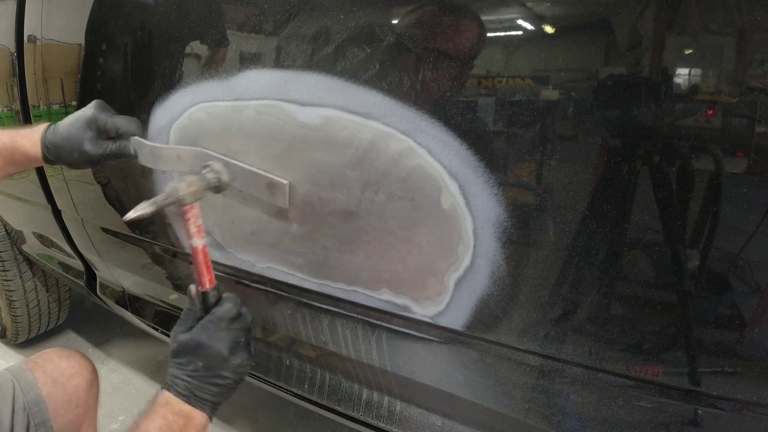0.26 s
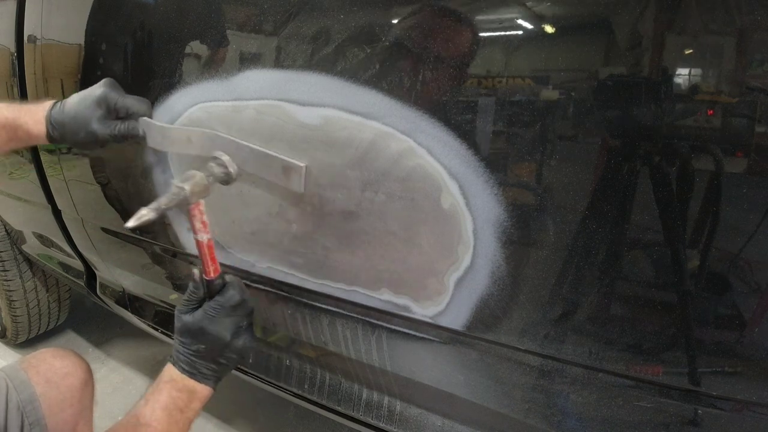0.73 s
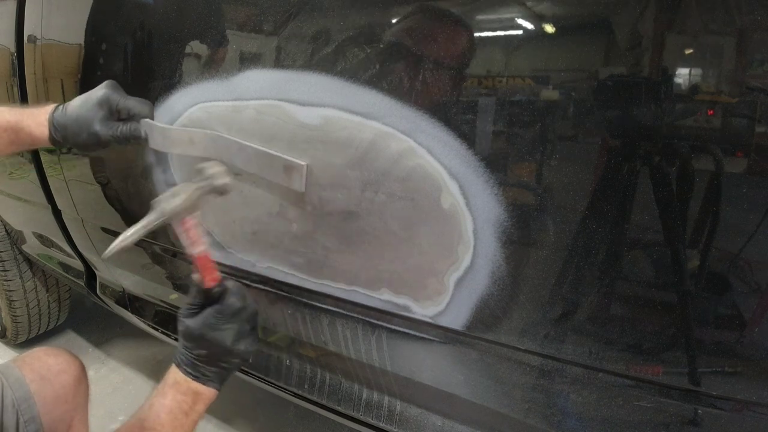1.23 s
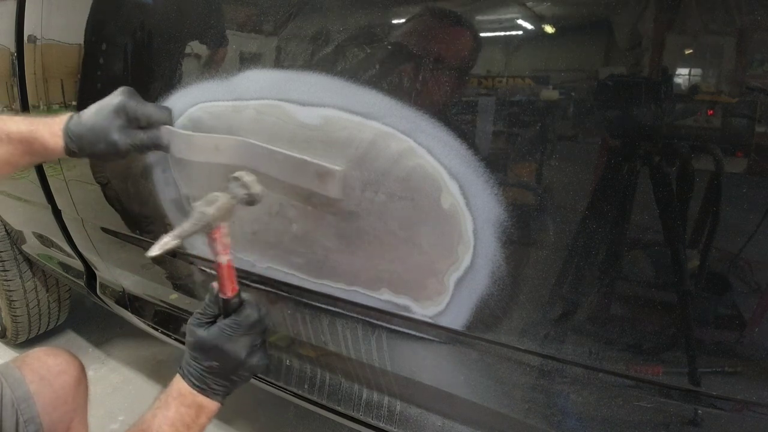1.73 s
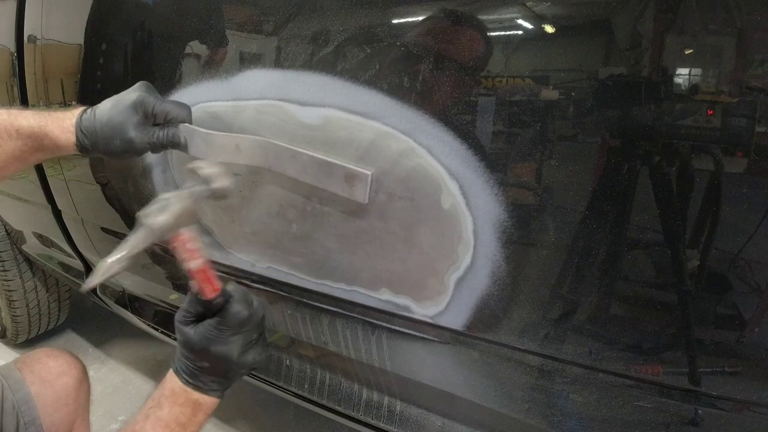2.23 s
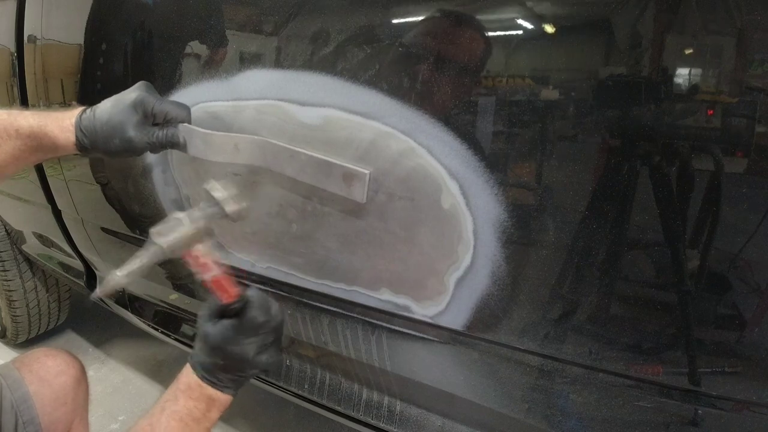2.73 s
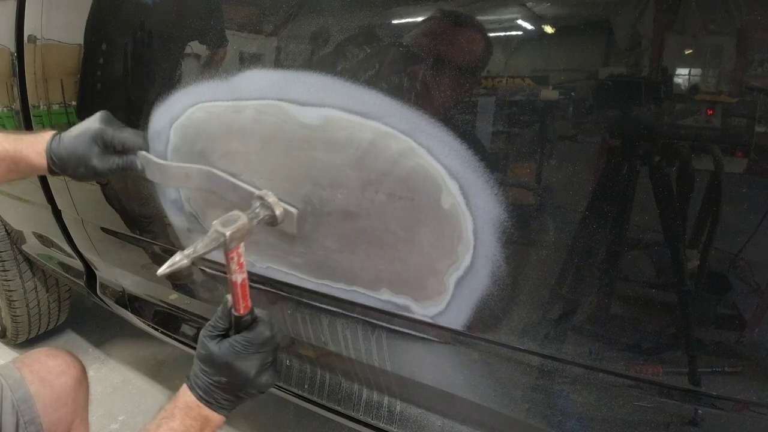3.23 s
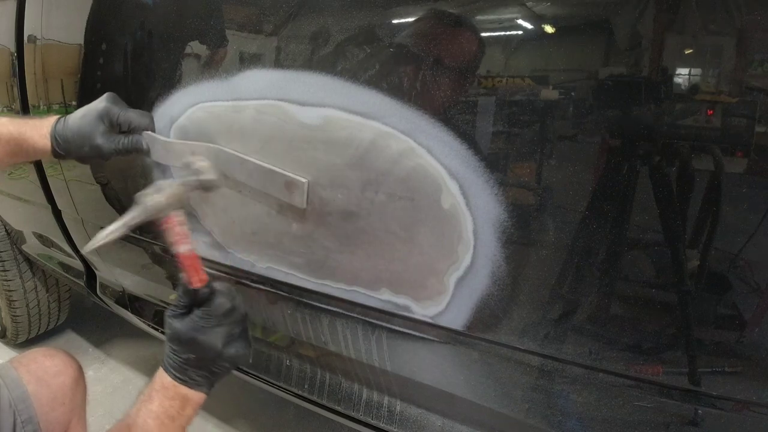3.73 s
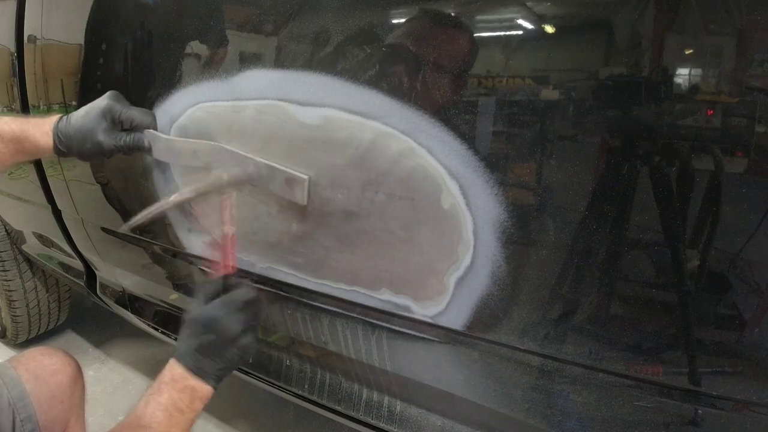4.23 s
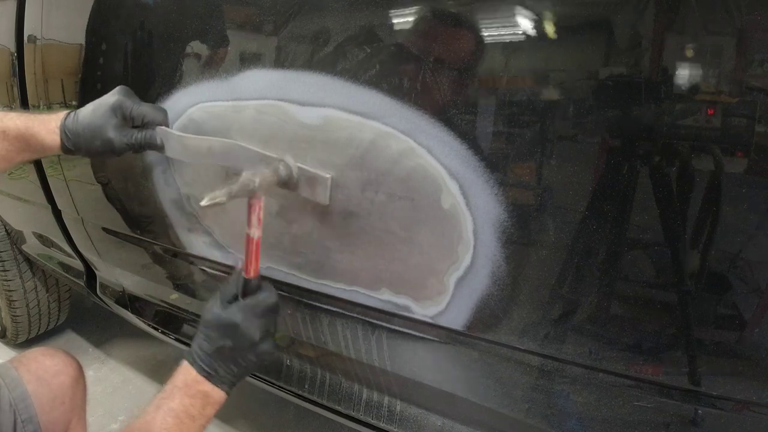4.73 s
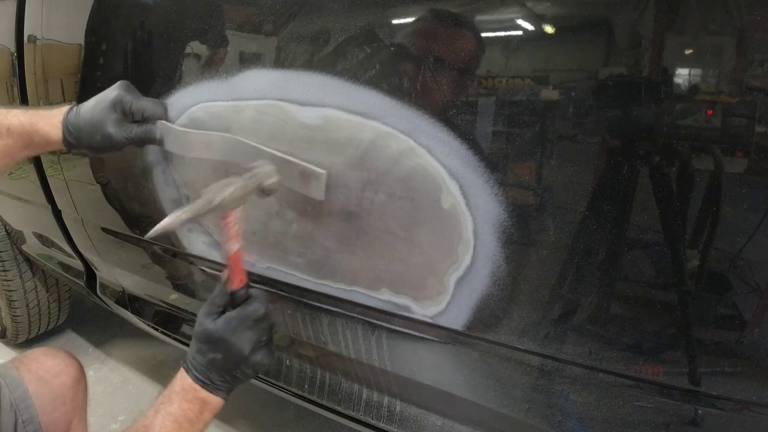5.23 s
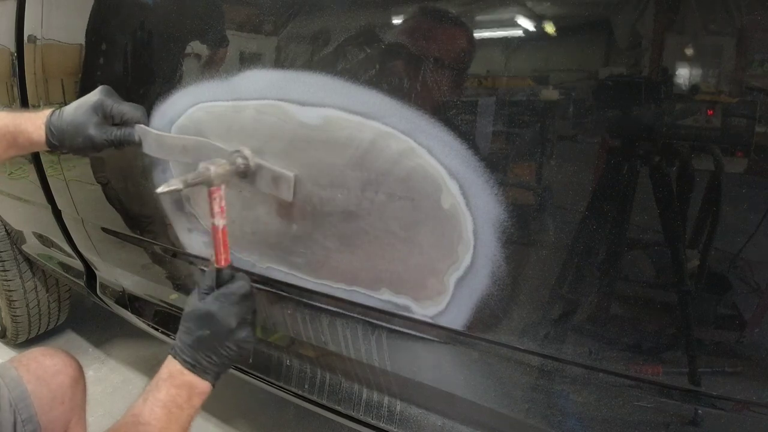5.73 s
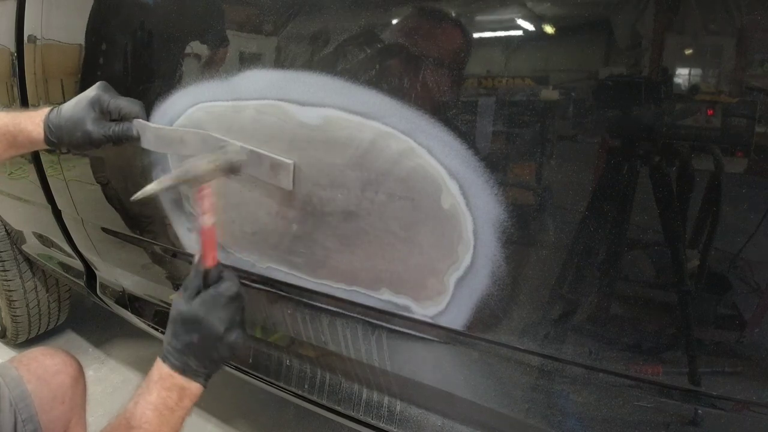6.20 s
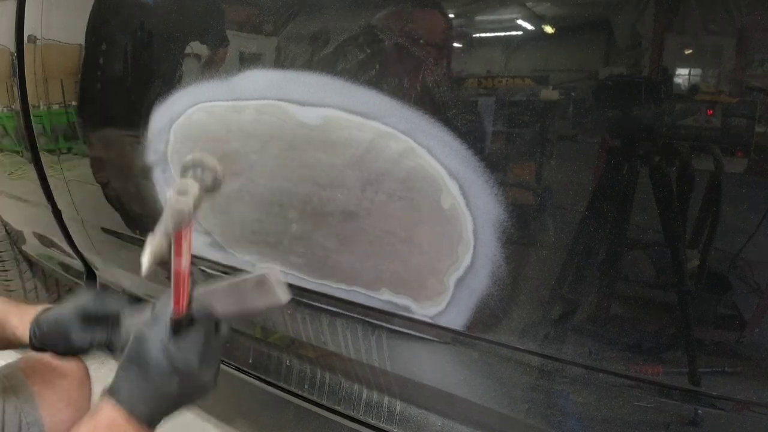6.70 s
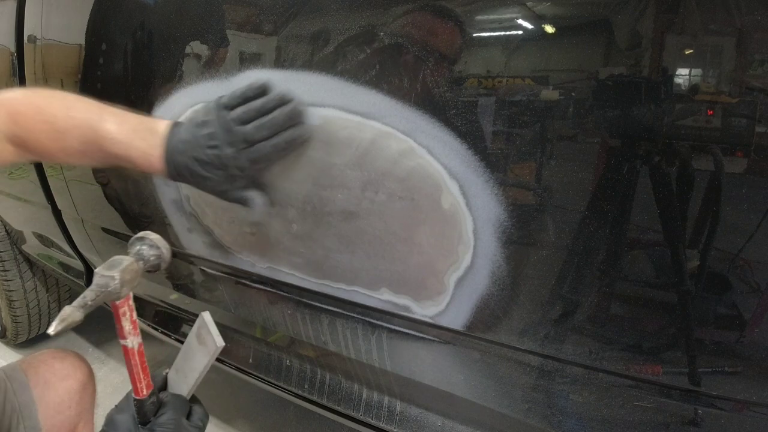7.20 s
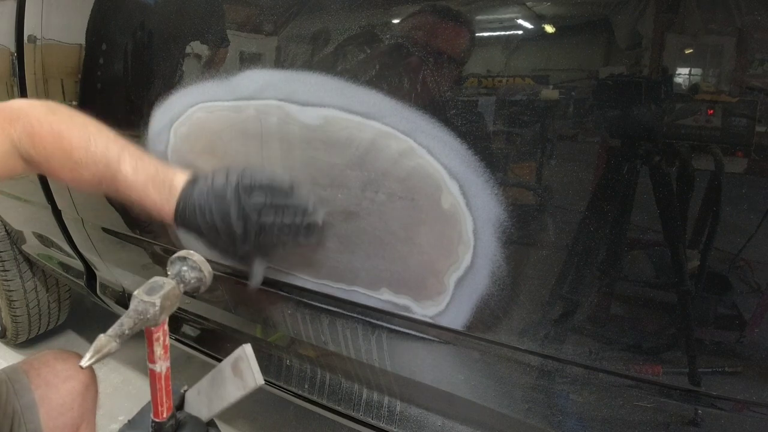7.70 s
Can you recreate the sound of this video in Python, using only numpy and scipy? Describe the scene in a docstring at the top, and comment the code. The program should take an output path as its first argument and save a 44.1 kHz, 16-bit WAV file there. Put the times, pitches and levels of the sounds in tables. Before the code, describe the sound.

A hammer strikes a flat steel spoon held against a car door, close up in a garage with a short echo. Each blow gives a bright, brief ring, a sheet metal crash and a hollow boom, slightly overloading the microphone; several end in a quick little bounce. The sound opens on the decay of one blow, followed by light taps and short scrapes until 0.8 seconds. Blows land at 1.2 and 1.6 seconds, the spoon scrapes around 2, and two more blows come at 2.6 and 3. A click and chattering scrapes follow from 3.2 to 3.7 seconds. Six steadier blows fall at about 4.1, 4.4, 4.9, 5.3, 5.9 and 6.2 seconds, with a tiny scrape at 5.5. After a faint tap at 6.8 seconds, a rubber glove wipes the bare metal in four soft, hollow, lightly hissing strokes until about 8 seconds, over faint low room noise.

```python
"""Hammer and spoon on a car door

A body hammer strikes a flat steel spoon pressed on a car door, close to the microphone in a garage.
Each blow rings the spoon, sets the door skin crashing and booming, and overloads the microphone;
often the hammer bounces. Between blows the spoon scrapes to a new place, sticking and slipping.
At the end a gloved hand wipes over the bare metal."""
import sys
import numpy as np
from scipy import signal
from scipy.fft import rfft, irfft, next_fast_len
from scipy.io import wavfile
from scipy.ndimage import uniform_filter1d

SR = 44100
rng = np.random.default_rng(int(sys.argv[2]) if len(sys.argv) > 2 else 0)


def output_pcm(signal):
    """Save a mono or channel-first signal as 16-bit PCM at the path in sys.argv[1].

    Samples are clipped to [-1, 1] before scaling.
    """
    pcm = np.clip(np.atleast_2d(signal).T, -1, 1) * 32767
    wavfile.write(sys.argv[1], SR, np.round(pcm).astype(np.int16))


N = 350746
TIME = np.arange(N) / SR

# Table levels are relative: each layer is shaped and trimmed in its function.
# hammer blows: (time [s], door crash [dB], door boom [dB], spoon ring [dB], favoured pitch [Hz])
HAMMER_BLOWS = [(-.055, -3, -0.5, 1, 4770), (1.187, -1, 2.5, -1, 4770), (1.5515, 0.5, -7.5, 2.5, 6670),
                (2.5783, 0, -7.5, 2, 4830), (2.9703, 1, -6, 3.5, 6700), (4.066, 0.5, -0.5, -0.5, 6760),
                (4.4397, 0, 4, 5.5, 6900), (4.8966, -1, -4, -1.5, 3670), (5.2734, -2, 2.5, 3.5, 3620),
                (5.8743, -2, 0.5, -2.5, 3946), (6.2425, -1, 2.5, 1.5, 3750)]
# the hammer bounces back on the spoon: (time [s], level [dB], favoured pitch [Hz])
HAMMER_BOUNCES = [(1.2222, -9, 3946), (1.2265, -14, 3946), (1.5782, -9.5, 3946), (1.6116, -12.5, 3946),
                  (2.6074, -6.5, 3946), (4.1, -5.5, 3946), (4.107, -11.5, 3700), (4.5160, -5.5, 6760),
                  (4.9258, -12, 4350), (5.9092, -14.5, 3946), (5.9463, -5.5, 3700)]
# light touches of the tools: (time [s], click [dB], door knock [dB])
TOOL_TOUCHES = [(0.177, -22, -17), (0.2288, -25, -41.5), (0.492, -53, -36.5), (0.516, -46, -37),
                (0.5573, -36.5, -34.5), (2.031, -47, -44.5), (2.052, -45, -38), (2.326, -65, -49.5),
                (3.1863, -25, -27.5), (3.494, -45, -35), (6.82, -43, -45)]
# modes of the undamped spoon: (frequency [Hz], level [dB], t60 [s])
SPOON_MODES = [(3648, -1, 0.047), (3880, 2.5, 0.011), (4328, 0, 0.047), (4800, -5, 0.053),
               (6350, -15, 0.016), (6740, -12, 0.094), (8120, -5.5, 0.029), (9560, -17.5, 0.16),
               (10470, -14, 0.07), (12600, -22, .04)]
# the door's strongest modes: (frequency [Hz], level [dB], t60 [s])
DOOR_MODES = [(52.9, -27, 2.2), (68.5, -30.5, 0.63), (96.9, -13.5, 0.73), (125, -22, 0.41),
              (147.8, -17.5, 0.84), (171, -21.5, 0.56), (256.6, -15, 0.69), (415, -19.5, 0.64),
              (571.6, -14, 0.49), (839, -29, 0.64), (948, -23, 0.53)]
# crowded modes of the door skin: (frequency [Hz], spectral level [dB], t60 [s])
SKIN_BANDS = [(57.5, -3.5, 1), (108, 12, 0.69), (212, 12.5, 0.54), (336, 14.5, 0.19), (554, 16, 0.24),
              (1015, 9.5, 0.15), (1690, 6.5, 0.1), (2380, 0.5, 0.094), (3900, 16, 0.041),
              (6400, 7.5, 0.059), (9300, -0.5, 0.042), (15000, -5.5, .034)]
# spoon slides: (start [s], length [s], rumble [dB], chatter [dB], grit [dB], pressure change [dB])
SPOON_SLIDES = [(0.193, 0.13, -38, -37.5, -45.5, 10.5), (0.392, 0.04, -43.5, -57, -80, -3),
                (0.559, 0.18, -43, -38.5, -53.5, -23), (1.816, 0.2, -37, -30.5, -41, -14),
                (2.052, 0.042, -43.5, -49.5, -55, -2), (3.222, 0.098, -32.5, -30.5, -45, 0.5),
                (3.34, 0.14, -41, -33.5, -58, -13), (3.491, 0.16, -38, -39, -59.5, -3),
                (5.503, 0.024, -27.5, -30.5, -38, -6)]
# share of a pressure change heard in each layer: (rumble [ratio], chatter [ratio], grit [ratio])
PRESSURE_SHARES = (.25, 1.0, .6)
# glove strokes: (start [s], length [s], door rumble [dB], hiss [dB], pressure change [dB])
GLOVE_WIPES = [(6.848, 0.34, -58, -73.5, 4), (7.178, 0.19, -53, -61.5, 8), (7.406, 0.36, -48, -61.5, 1.5),
               (7.82, 0.125, -50.5, -56.5, 1.5)]
# tone colours: (frequency [Hz], spectral level [dB])
CLICK_EQ = [(800, -23.5), (2000, -6), (2700, 2.5), (4300, 5.5), (5500, -6.5), (11000, -17.5), (16000, -39)]  # tools touching
RUMBLE_EQ = [(100, -17), (200, -9.5), (400, -0.5), (620, 6.5), (780, 0.5), (1020, 1), (1250, -4.5),
             (1900, -13.5), (3200, -41)]  # door under the sliding spoon
CHATTER_EQ = [(2000, -18.5), (2500, -11), (2900, -5), (3300, -6), (3700, -1.5), (4300, -0.5), (4650, -5),
              (5100, -17.5), (6500, -36)]  # the spoon shaking
GRIT_EQ = [(3000, -19.5), (5000, 6.5), (7000, -1.5), (9700, -6), (12000, -22), (15500, -27.5)]  # hiss of sanded steel
GLOVE_RUMBLE_EQ = [(50, -28), (100, 4.5), (160, 1), (250, -3.5), (420, -1), (700, -6.5), (1000, -6),
                   (1500, -17.5), (2500, -28), (5000, -60)]  # door under the glove
GLOVE_HISS_EQ = [(1290, -32), (2200, -24), (2570, -3.5), (3560, 6), (5270, 5), (10100, -2), (15500, -17)]  # rubber on bare metal
ROOM_TONE_EQ = [(20, -28), (35, -16), (52, 3.5), (80, -5), (110, -7), (190, -13.5), (228, -1), (300, -17),
                (700, -24), (2000, -40), (4000, -33.5), (8000, -49), (15000, -54.5)]  # quiet garage air
# garage reverb: (frequency [Hz], level [dB], t60 [s])
GARAGE_BANDS = [(70.4, -13, 0.65), (210, 1, 0.7), (454, -2.5, 0.5), (876, -6.5, 0.67), (2030, -6.5, 0.71),
                (4170, -15, 0.55), (6300, -7.5, 0.51), (9390, -12, 0.4), (15000, -14, 0.34)]


def hammering(pressed_ring=0.47, bounce_ring=0.56, bounce_crash_db=-13):
    """Blows and bounces; a full blow presses the spoon to the door and chokes its ring harder."""
    track = np.zeros(N)
    for time, crash_db, boom_db, ring_db, favoured_hz in HAMMER_BLOWS:
        add(track, time, with_reverb(clang(crash_db, ring_db, favoured_hz, pressed_ring)))
        add(track, time, undb(boom_db) * door_boom())
    for time, db, favoured_hz in HAMMER_BOUNCES:
        add(track, time, with_reverb(clang(db + bounce_crash_db, db, favoured_hz, bounce_ring)))
    return track


def clang(crash_db, ring_db, favoured_hz, decay_scale):
    """Steel on steel: the spoon rings and passes the blow into the door skin."""
    hit = undb(crash_db) * door_crash()
    add(hit, 0, undb(ring_db) * spoon_ring(favoured_hz, decay_scale))
    return hit


def spoon_ring(favoured_hz, decay_scale, favour_db=6, scatter_db=2, detune=0.0045,
               stiffen=0.056, contact_s=0.0014):
    """The steel bar rings, sharp while the hammer touches it; the spot hit favours one pitch."""
    hz, db, t60 = np.transpose(SPOON_MODES)
    pitch_draw, level_draw = rng.standard_normal((2, len(hz)))
    favoured = np.abs(np.log(hz / favoured_hz)) < .05  # modes within about 5 %
    mode_db = db + favour_db * favoured + scatter_db * level_draw
    t = TIME[:SR // 4]
    bent_time = t + stiffen * contact_s * np.tanh(t / contact_s)
    return ring(hz * (1 + detune * pitch_draw), mode_db, t60 * decay_scale, bent_time)


def door_crash(spread_s=0.0019):
    """Bending waves spread from the spoon and fill the door skin."""
    attack = 1 - np.exp(-(TIME[:SR] + 1 / SR) / spread_s)
    return wash(*np.transpose(SKIN_BANDS)) * attack


def door_boom(scatter_db=2.0, detune=.02, swell_s=0.0063, stretch=.06, relax_s=.04):
    """The whole door swings up more slowly; the stretched skin starts sharp and sinks as it relaxes."""
    hz, db, t60 = np.transpose(DOOR_MODES)
    pitch_draw, level_draw = rng.standard_normal((2, len(hz)))
    t = TIME[:2 * SR]
    bent_time = t + stretch * relax_s * np.tanh(t / relax_s)
    swell = 1 - np.exp(-t / swell_s)
    return ring(hz * (1 + detune * pitch_draw), db + scatter_db * level_draw, t60, bent_time) * swell


def tool_touches(click_t60=0.021, soft_hz=1300, crash_db=-7, boom_db=-4):
    """The tools click lightly; such soft contact reaches only the door's lower modes."""
    track = np.zeros(N)
    lowpass = signal.butter(3, soft_hz, fs=SR, output="sos")
    for time, click_db, knock_db in TOOL_TOUCHES:
        click = colour(rng.standard_normal(SR), CLICK_EQ) * undb(-60 * TIME[:SR] / click_t60)
        knock = signal.sosfilt(lowpass, door_crash())
        add(track, time, with_reverb(undb(click_db) * click + undb(knock_db + crash_db) * knock))
        add(track, time, undb(knock_db + boom_db) * door_boom())
    return track


def spoon_scrape(judder_db=1.0, judder_hz=140, chatter_db=-3.0, grit_db=-1):
    """The spoon's edge sticks and slips on sanded steel, shaking both door and spoon."""
    shares = np.array(PRESSURE_SHARES)[:, None]
    rumble_gain, chatter_gain, grit_gain = sum(
        undb(levels)[:, None]
        * stroke(start, length, shares * change_db, attack_s=0.015, release_db_per_s=381.5)
        for start, length, *levels, change_db in SPOON_SLIDES)
    flutter_db = judder_db * np.interp(TIME * judder_hz, np.arange(N), rng.standard_normal(N))
    slips = catches(per_s=3300, spread_db=0.91) * undb(flutter_db)
    fine_slips = catches(per_s=22000, spread_db=1.5) * undb(flutter_db / 2)
    rumble = rumble_gain * colour(slips, RUMBLE_EQ)
    chatter = undb(chatter_db) * chatter_gain * colour(slips, CHATTER_EQ)
    grit = undb(grit_db) * grit_gain * colour(fine_slips, GRIT_EQ)
    return rumble + chatter + grit


def glove_wipe(hiss_db=-1):
    """Soft rubber catches finely on the panel: a hollow rub with a light hiss on top."""
    rumble_gain, hiss_gain = sum(
        undb(levels)[:, None] * stroke(start, length, change_db, attack_s=0.034, release_db_per_s=252)
        for start, length, *levels, change_db in GLOVE_WIPES)
    slips = catches(per_s=9000, spread_db=1.85)
    rumble = rumble_gain * colour(slips, GLOVE_RUMBLE_EQ)
    hiss = undb(hiss_db) * hiss_gain * colour(slips, GLOVE_HISS_EQ)
    return rumble + hiss


def catches(per_s, spread_db):
    """Friction: tiny catches of unequal size at random moments."""
    impulses = (rng.random(N) < per_s / SR) * rng.choice([-1, 1], N)
    return impulses * undb(spread_db * rng.exponential(size=N).clip(0, 4))


def stroke(start, length, change_db, attack_s, release_db_per_s):
    """Envelope of one slide: it sets in, presses steadily harder or lighter, then runs out."""
    t = np.maximum(TIME - start, 0)
    pressure_db = change_db * np.minimum(t / length, 1)
    release_db = release_db_per_s * np.maximum(t - length, 0)
    return np.minimum(t / attack_s, 1) * undb(pressure_db - release_db)


def with_reverb(hit, blur_hz=100, predelay_s=0.0076):
    """A hit, then a diffuse tail off the walls that keeps only its broad colour."""
    t = TIME[:SR]
    blurred_power = uniform_filter1d(np.abs(rfft(hit, SR)) ** 2, blur_hz)
    tail = irfft(rfft(garage_response()) * np.sqrt(blurred_power), SR)
    fade_in = np.clip(t / predelay_s - 1, 0, 1)
    fade_out = np.clip((.85 - t) * 10, 0, 1)
    return hit + tail * fade_out * fade_in


def garage_response():
    """The room's answer to one click; the treble dies first."""
    hz, db, t60 = np.transpose(GARAGE_BANDS)
    unit_energy_db = 10 * np.log10(2 * np.log(1000) / (t60 * SR))
    return wash(hz, db + unit_energy_db, t60)


def room_tone():
    """The garage air: a steady bed of low noise."""
    return colour(rng.standard_normal(N), ROOM_TONE_EQ)


def ring(hz, db, t60, t):
    """Separate modes: decaying sines of random polarity."""
    signs = rng.choice([-1, 1], len(hz))
    return sum(sign * undb(level - 60 * t / decay) * np.sin(2 * np.pi * freq * t)
               for sign, freq, level, decay in zip(signs, hz, db, t60))


def wash(hz, db, t60):
    """One second of countless modes: noise in which each band dies at its own rate."""
    spectrum = rfft(rng.standard_normal(SR)) * undb(over_hz(SR, hz, db))
    return sum(irfft(spectrum * over_hz(SR, hz, band), SR) * undb(-60 * TIME[:SR] / decay)
               for band, decay in zip(np.eye(len(hz)), t60))


def colour(sound, eq):
    """Shape a sound with an EQ curve and bring it to rms 1."""
    n = next_fast_len(len(sound))
    gains = undb(over_hz(n, *np.transpose(eq)))
    shaped = irfft(rfft(sound, n) * gains, n)[:len(sound)]
    return shaped / np.std(shaped)


def over_hz(n, hz, values):
    """Values joined on a log-frequency axis, for each bin of an n-point spectrum."""
    return np.interp(np.log(np.fft.rfftfreq(n, 1 / SR) + 1), np.log(hz), values)


def add(track, time, sound):
    """Mix a sound into the track at a time in seconds, trimming any overhang."""
    start = int(round(time * SR))
    sound, start = sound[max(-start, 0):], max(start, 0)
    track[start:start + len(sound)] += sound[:N - start]


def undb(db):
    """Decibels to gain."""
    return 10 ** (np.asarray(db) / 20)


def scene(reverb_send_db=-6, room_tone_db=-58):
    """The mono mix: tools and glove up front, garage reverb and room tone behind."""
    rubs = spoon_scrape() + glove_wipe()
    rub_reverb = undb(reverb_send_db) * signal.fftconvolve(rubs, garage_response())[:N]
    bed = undb(room_tone_db) * room_tone()
    return (hammering() + tool_touches() + rubs + rub_reverb + bed)[None]


def record(dry, low_cut_hz=40, ceiling=0.66, high_cut_hz=15700):
    """The microphone drops the sub bass and overloads, flattening each blow's attack; the top is cut."""
    lean = signal.sosfilt(signal.butter(4, low_cut_hz, "high", fs=SR, output="sos"), dry)
    oversampled = signal.resample_poly(lean, 2, 1, axis=-1)
    saturated = oversampled / (1 + (oversampled / ceiling) ** 8) ** (1 / 8)
    clipped = signal.resample_poly(saturated, 1, 2, axis=-1)
    return signal.fftconvolve(clipped, signal.firwin(121, high_cut_hz, fs=SR)[None], "same")


dry = scene()
out = record(dry)
output_pcm(out)
```